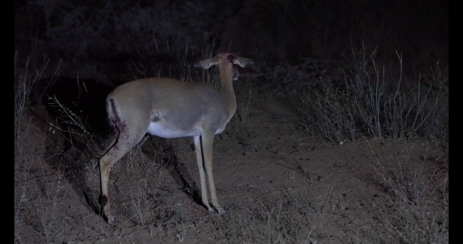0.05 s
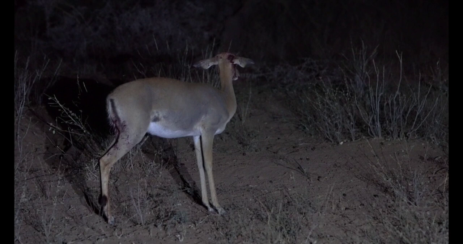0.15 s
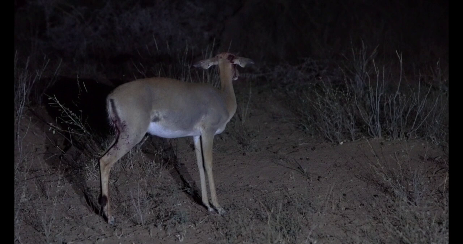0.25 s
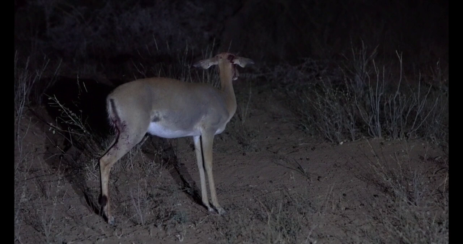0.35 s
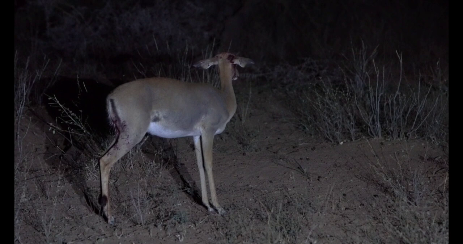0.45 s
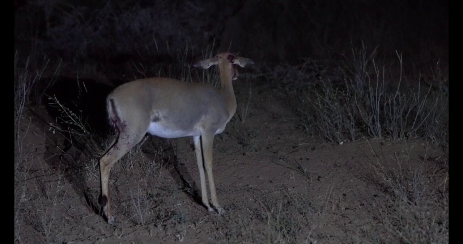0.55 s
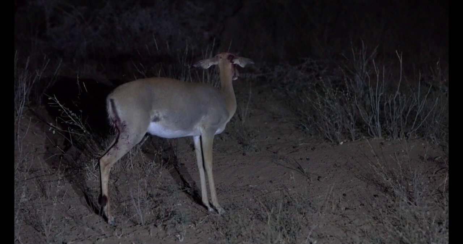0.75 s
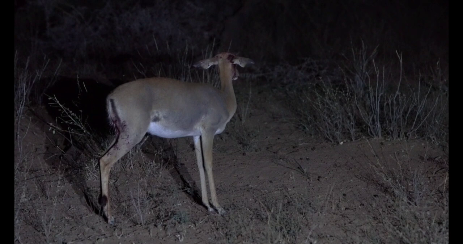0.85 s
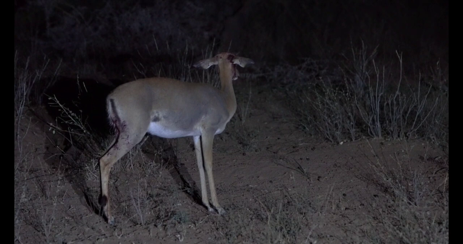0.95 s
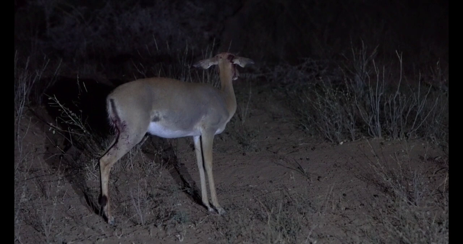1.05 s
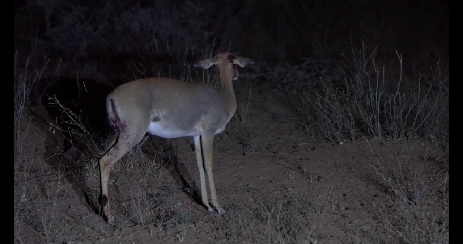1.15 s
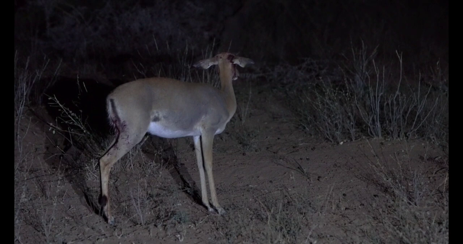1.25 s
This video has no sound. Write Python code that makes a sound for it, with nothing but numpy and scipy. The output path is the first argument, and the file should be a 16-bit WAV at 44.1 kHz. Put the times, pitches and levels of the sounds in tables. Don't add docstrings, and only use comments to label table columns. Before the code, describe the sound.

A distant jackal howls once in the dark bush. After a brief quiet hush, it yelps upward from 0.16 seconds, holds a thin, pure whistle from 0.24 to 0.75, then slides down through a voice break near 1.1 into a moan until 1.3, with diffuse echo. Light camera knocks click at the start and 0.46; dry grass ticks sparsely from 0.26 over soft hiss.

```python
import sys
import numpy as np
from scipy import signal
from scipy.io import wavfile
from scipy.ndimage import uniform_filter1d

SR = 44100
rng = np.random.default_rng(int(sys.argv[2]) if len(sys.argv) > 2 else 0)


def master_out(mix):
    frames = np.transpose(np.atleast_2d(mix))
    ceiling = np.clip(frames, -1, 1)
    pcm = np.round(ceiling * 32767).astype(np.int16)
    wavfile.write(sys.argv[1], SR, pcm)


def undo_db(level):
    steps = np.asarray(level, float) / 20
    return 10 ** steps


N = 57330


def evened(x):
    return x / np.sqrt(np.mean(x ** 2) + 1e-20)


def read(points, hz):
    f, value = np.transpose(points)
    return np.interp(np.log(hz + 1), np.log(f + 1), value)


def wander(smooth):
    once = uniform_filter1d(rng.standard_normal(N), int(smooth))
    return evened(uniform_filter1d(once, int(smooth)))


def night():
    # pitch_hz, level_db (per Hz)
    hush_colour = [(15, -44), (35, -27), (65, -2), (140, -5), (300, -5.5), (700, -9.5), (2500, -15),
                   (15500, -20.5)]
    # pitch_hz, side_over_middle_db
    spread = [(30, -25), (70, -16), (140, -8.5), (300, -2.5), (700, 4), (1300, 1.5), (4000, 1),
              (15000, -.5)]
    # pitch_hz, left_minus_right_db
    side_lean = [(100, -0.5), (500, 0.5), (2000, -1), (5000, 1), (12000, 0.2)]
    level_db, patch_db = -51, 1.38
    swell_db_per_s, swell_top_hz = 1.5, 905

    frames, hz = N // 256 + 5, np.fft.rfftfreq(1024, 1 / SR)
    a, b, c, d, patches = rng.standard_normal((frames, 513, 5)).T
    patches = evened(uniform_filter1d(uniform_filter1d(patches, 10, 0), 10, 1))
    low_share = 1 / (1 + (hz / swell_top_hz) ** 2)
    swell_db = swell_db_per_s * np.outer(low_share, np.arange(frames) * 256 / SR)

    mid = a + 1j * b
    side = (c + 1j * d) * undo_db(read(spread, hz))[:, None]
    lean = undo_db(read(side_lean, hz) / 2)[:, None]
    spectrum = np.array([(mid + side) * lean, (mid - side) / lean])
    spectrum *= undo_db(read(hush_colour, hz)[:, None] + patch_db * patches + swell_db)
    noise = signal.istft(spectrum, nperseg=1024, noverlap=768)[1][:, :N]
    return undo_db(level_db) * evened(noise)


def add(mix, s, sound, pan_db):
    at = round(s * SR)
    mix[:, at:at + len(sound)] += undo_db(np.array([[pan_db / 2], [-pan_db / 2]])) * sound


def ticks():
    # start_s, level_db, pan_db
    knocks = [
        (.0074, -35, 6.6),
        (0.4604, -34.5, 13),
    ]
    # pitch_hz, level_db, t60_s (time to fade by 60 dB)
    knock_modes = [
        [(1800, -3, 0.015), (5170, 5.5, 0.0089), (6750, -8, 0.0061), (10260, -9.5, 0.0093)],
        [(3790, -3.5, 0.015), (6180, 2, 0.0033), (8540, 0, 0.0034), (13800, -11, 0.0047), (1710, -11, 0.035)],
    ]
    # start_s, level_db, pitch_hz, pan_db
    grass_ticks = [
        (0.2596, -39, 5370, 13),
        (0.6107, -44.5, 4320, 14),
        (.826, -36, 4600, 12),
        (0.9756, -38, 4640, 14),
        (1.17, -41, 4700, 11),
    ]
    rise_share, tick_cycles = 0.02, 2.63

    mix, t = np.zeros((2, N)), np.arange(1500) / SR
    for (s, db, pan_db), modes in zip(knocks, knock_modes):
        ring = np.zeros(len(t))
        for hz, mode_db, t60 in modes:
            swing = np.sin(2 * np.pi * hz * t)
            ring += undo_db(mode_db - 60 * t / t60) * (1 - np.exp(-t / (rise_share * t60))) * swing
        add(mix, s, undo_db(db) * ring, pan_db)
    for s, db, hz, pan_db in grass_ticks:
        u = t * hz / tick_cycles
        burst = np.exp(-8 * (u - 1) ** 2) * np.sin(2 * np.pi * hz * t)
        add(mix, s, undo_db(db) * burst, pan_db)
    return mix


def bush(x):
    level_db, t60_s, start_s = -14.5, 1.18, 0.013
    like = 0.66

    places = np.arange(0, SR, 20)
    taps = np.zeros((2, SR + 20))
    spots = places + rng.integers(0, 20, (2, len(places)))
    np.put_along_axis(taps, spots, rng.choice([-1., 1.], (2, len(places))), 1)
    t = np.arange(SR + 20) / SR
    taps *= undo_db(-60 * t / t60_s) * np.clip(t / start_s - 1, 0, 1)
    taps[1] = like * taps[0] + np.sqrt(1 - like ** 2) * taps[1]
    taps /= np.linalg.norm(taps[0])
    return undo_db(level_db) * signal.fftconvolve(x[None], taps, axes=1)[:, :N]


def follow(rows):
    jitter, edge_s = .001, .003
    t = np.arange(N) / SR
    s, pitch, *levels = np.transpose(rows)
    gate = np.sqrt(2) * np.clip(np.minimum(t - s[0], s[-1] - t) / edge_s + .5, 0, 1)
    hz = np.interp(t, s, pitch) * (1 + jitter * wander(220))
    return hz, gate, [np.interp(t, s, db) for db in levels]


def onset(rows, partials):
    shimmer_db = 3
    hz, gate, (db,) = follow(rows)
    turns = np.cumsum(hz) / SR
    tone = np.zeros(N)
    for k, k_db in partials:
        unsteady = undo_db(k_db + shimmer_db * wander(78))
        tone += unsteady * np.sin(2 * np.pi * (k * turns + rng.random()))
    return gate * undo_db(db) * tone


def whistle():
    # time_s, pitch_hz, level_db, overtone_db
    high = [(.2395, 1392, -38.5, -54.5), (.25, 1400, -39.5, -54), (.27, 1441, -34, -57.5),
            (.293, 1480, -37, -68), (.32, 1488, -41, -58), (.34, 1501, -37, -71.5),
            (.385, 1494, -33.5, -72), (.43, 1490, -36, -69), (.476, 1474, -31.5, -66),
            (0.509, 1465, -39.5, -65), (0.535, 1457, -31.5, -67), (0.579, 1431, -32.5, -64),
           (0.621, 1413, -33, -65), (.648, 1408, -35.5, -62.5), (.712, 1383, -35.5, -60),
           (0.737, 1362, -43.5, -62), (.748, 1355, -38, -67), (0.759, 1305, -50.5, -67)]
    hz, gate, (db, overtone_db) = follow(high)
    phase = 2 * np.pi * np.cumsum(hz) / SR
    return gate * (undo_db(db) * np.sin(phase) + undo_db(overtone_db) * np.sin(2 * phase))


def register(rows, lead, throat):
    tilt_db, shimmer_db = -1.5, 1.2
    roll_db_per_khz = -68
    hz, gate, (db,) = follow(rows)
    out, turns = np.zeros(N), np.cumsum(hz) / SR
    for k in range(2, 9):
        colour_db = read(throat, k * hz) - read(throat, lead * hz)
        colour_db += tilt_db * (k - lead) + shimmer_db * wander(390)
        colour_db += roll_db_per_khz * np.maximum(k * hz - throat[-1][0], 0) / 1000
        out += undo_db(colour_db) * np.sin(2 * np.pi * (k * turns + rng.random()))
    return gate * undo_db(db) * out


def jackal():
    # time_s, pitch_hz, level_db
    whine = [(.162, 386, -59), (.172, 398, -54), (.185, 415, -56), (.195, 425, -66)]
    yelp = [(.183, 455, -60), (.19, 505, -53), (.2, 545, -51), (.215, 580, -53), (.23, 620, -52),
            (.242, 668, -57), (.256, 705, -60), (.268, 722, -67)]
    slide = [(.747, 691, -65), (.754, 654.6, -51.5), (.761, 625.4, -50.5), (.833, 605, -49.5),
             (.853, 590.3, -49), (.973, 570, -52.5), (1.021, 537.7, -45.5), (1.043, 543, -51),
             (1.062, 524.5, -42)]
    voice_break = [(1.07, 505, -46), (1.077, 480, -41), (1.09, 470, -40), (1.115, 458, -42),
                   (1.13, 451, -48), (1.152, 441, -49), (1.165, 435, -58)]
    moan = [(1.172, 431.7, -60), (1.19, 423, -55.5), (1.225, 403.3, -53.5), (1.255, 391, -50.5),
            (1.275, 387, -54), (1.3, 378, -46.5)]
    # partial_number, level_db
    whine_partials = [(2, -20), (3, -2), (4, -2), (5, -16)]
    yelp_partials = [(2, -10), (3, -1), (4, -17)]
    # pitch_hz, level_db
    slide_throat = [(700, -28), (1250, -15), (1420, 6), (1800, -10.5), (2000, -8), (2350, -31.5),
                    (2850, -16.5), (3150, -25)]
    moan_throat = [(700, -19), (1150, -17.5), (1280, -1), (1550, 0.5), (1950, -6.5), (2100, -20),
                   (2500, -11), (2700, -20)]

    rise = onset(whine, whine_partials) + onset(yelp, yelp_partials)
    fall = register([*slide, *voice_break], 3, slide_throat) + register(moan, 4, moan_throat)
    return rise + whistle() + fall


def scene():
    pan_db, right_delay_s = -3, .00003
    voice = jackal()
    late = np.interp(np.arange(N) - right_delay_s * SR, np.arange(N), voice)
    direct = np.array([voice * undo_db(pan_db / 2), late * undo_db(-pan_db / 2)])
    return direct + bush(voice) + night() + ticks()


def top_cut(x):
    return signal.sosfilt(signal.butter(12, 16920, fs=SR, output="sos"), x)


def record(dry):
    low_pass = signal.firwin(1023, 15790, window=("kaiser", 9), fs=SR)
    limited = signal.oaconvolve(dry, low_pass[None], "same")
    return top_cut(limited)


dry = scene()
out = record(dry)
master_out(out)
```